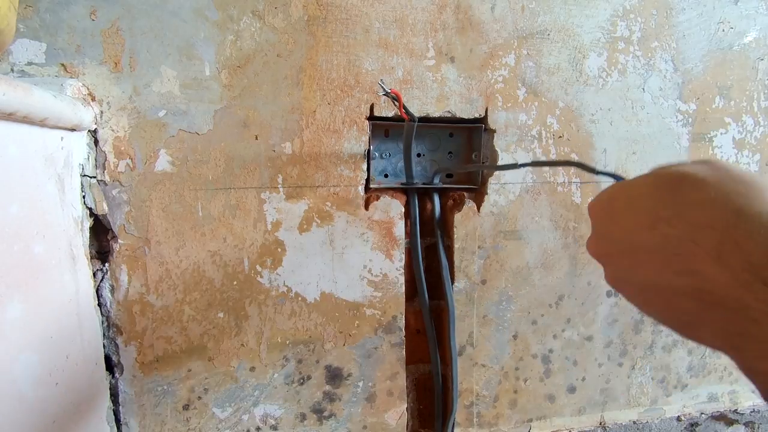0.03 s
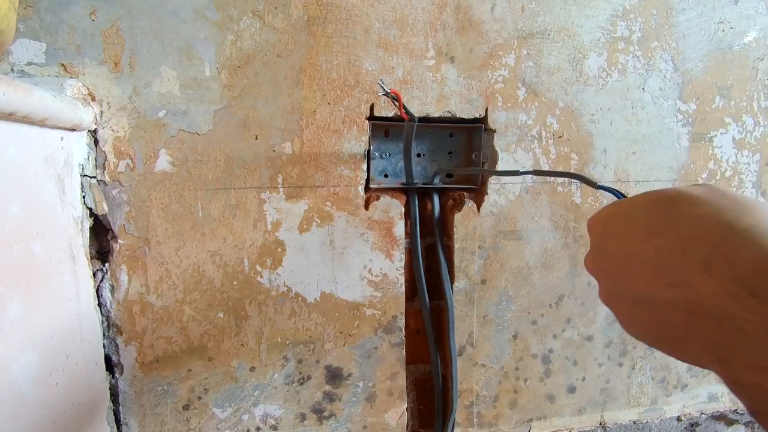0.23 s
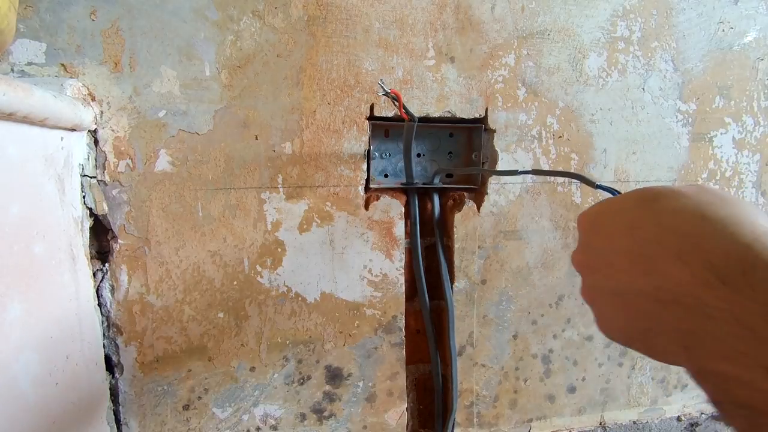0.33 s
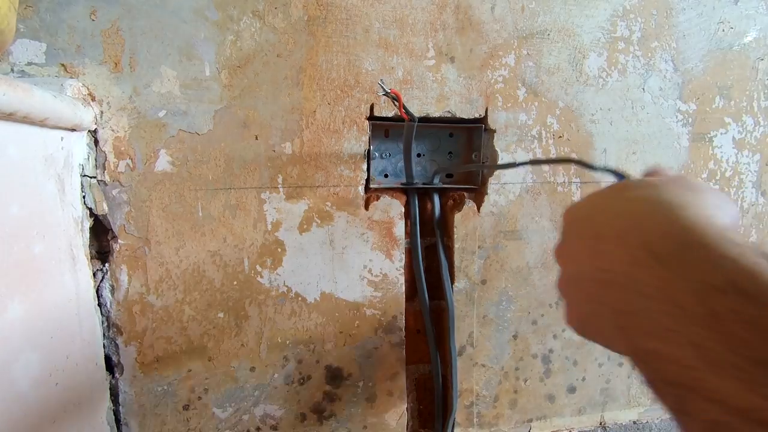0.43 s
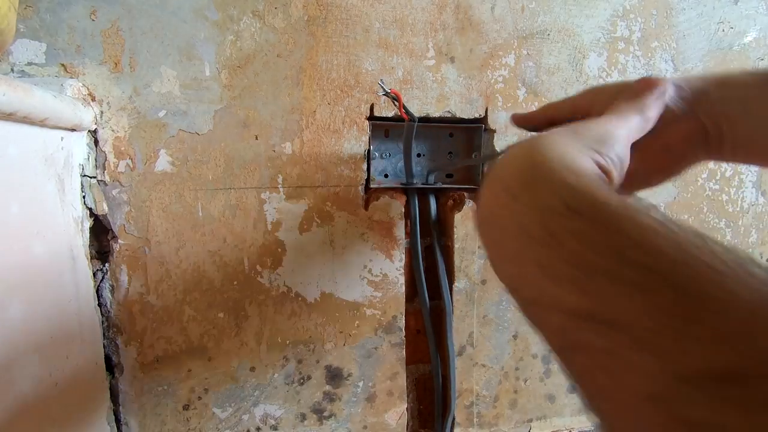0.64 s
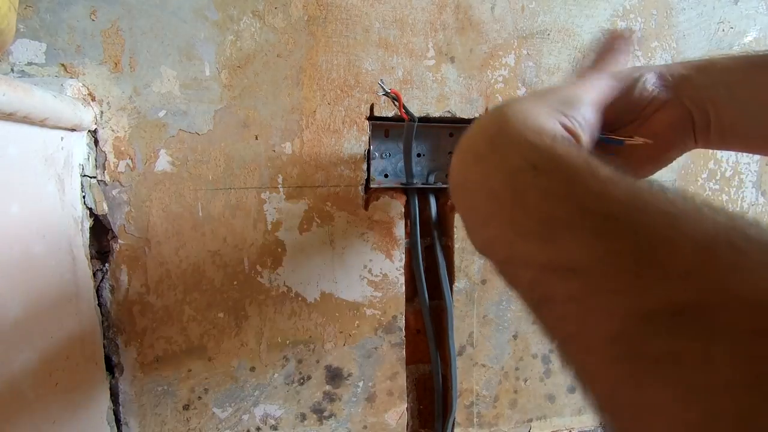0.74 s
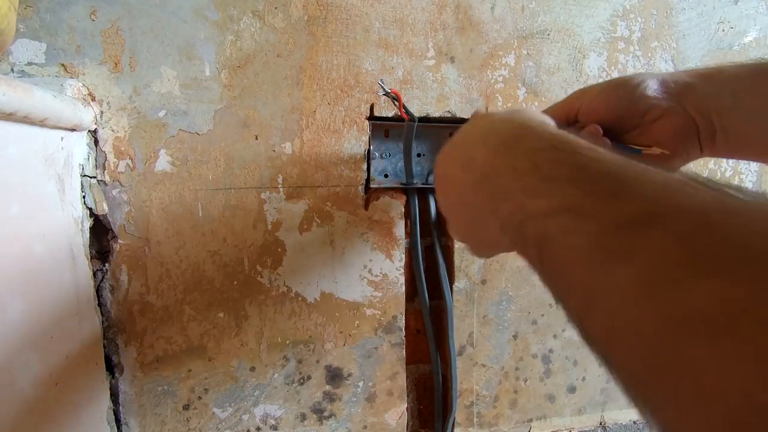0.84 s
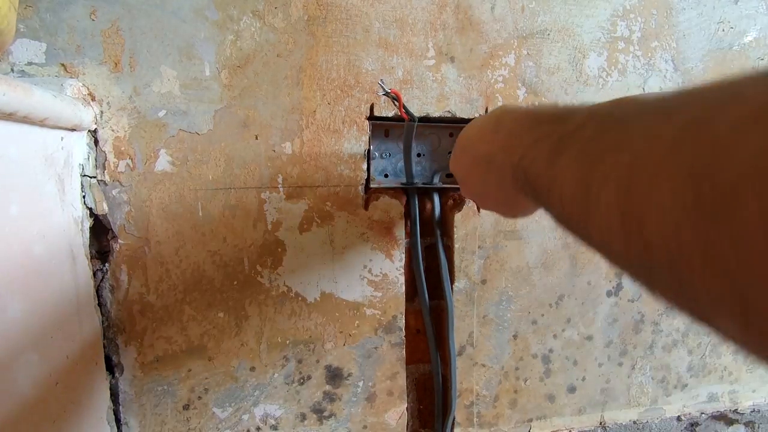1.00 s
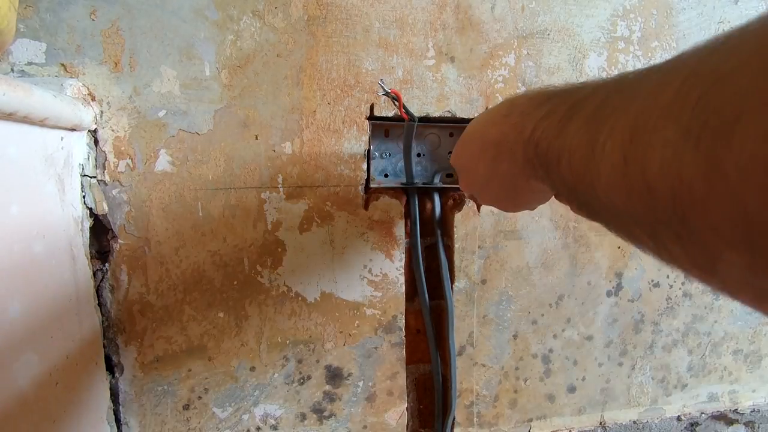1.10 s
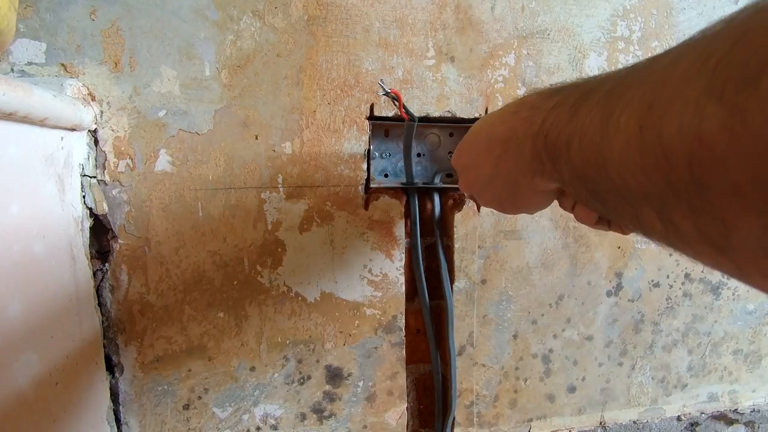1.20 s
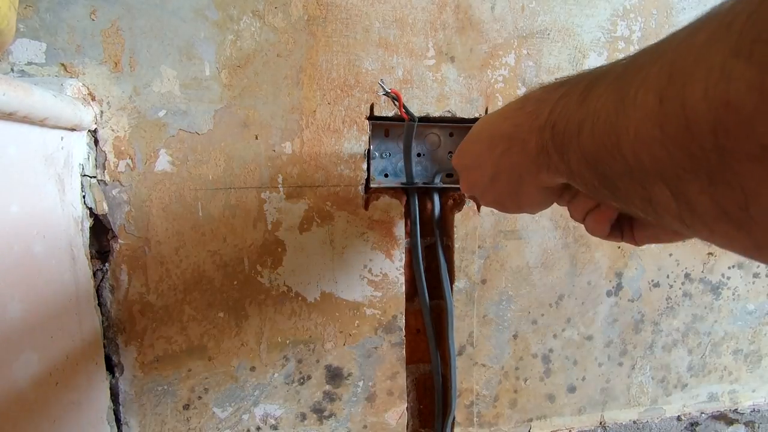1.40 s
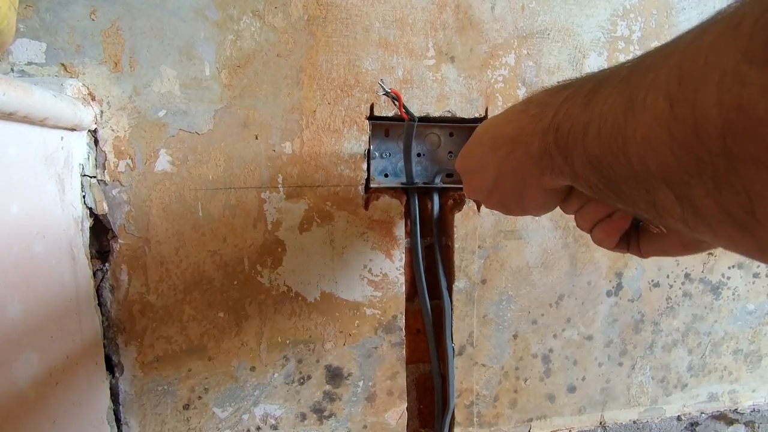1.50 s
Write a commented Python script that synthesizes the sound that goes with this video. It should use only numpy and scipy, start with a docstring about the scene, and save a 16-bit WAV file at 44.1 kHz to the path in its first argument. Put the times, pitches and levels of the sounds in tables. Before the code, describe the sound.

Wire strippers drop onto a hollow board with a loud thud and clatter, then cable creaks softly

```python
"""A bare room: wire strippers drop on a hollow board, thud, clatter and rock to rest, overloading the microphone.
Filtered clicks and damped modes make the thuds, dying noise bursts the steel jaws.
A hand then pats the cable and bends it into a metal wall box: noise ticks and ringing modes make it tick and creak.
Shaped noise makes the short slides, grainy rubbing, a faint early reverberation, the room air and a low rumble.
The struck sounds and the cable's ticks and creaks feed a noise reverberation, heard through two microphone ports."""
import sys
import numpy as np
from scipy import signal
from scipy.fft import rfft, irfft
from scipy.io import wavfile
from scipy.ndimage import uniform_filter1d

SR = 44100
rng = np.random.default_rng(int(sys.argv[2]) if len(sys.argv) > 2 else 0)


def waveform_to_disk(signal):
    """Save audio, clipped to [-1, 1], as 16-bit WAV at the path in sys.argv[1]."""
    frames = np.transpose(np.atleast_2d(signal))
    scaled = np.clip(frames, -1, 1) * 32767
    samples = np.round(scaled).astype(np.int16)
    wavfile.write(sys.argv[1], SR, samples)


N = 68355
T = np.arange(N) / SR
BIN_HZ = np.fft.rfftfreq(N, 1 / SR)


def amp(db):
    """Decibels to gain."""
    return 10 ** (np.asarray(db) / 20)


def unit(x):
    """Scales to an energy of one, averaged over the channels."""
    return x / np.sqrt(np.mean(np.sum(x ** 2, -1)) + 1e-20)


def read(points, hz):
    """Reads a table on a logarithmic frequency axis."""
    f, value = np.transpose(points)
    return np.interp(np.log(hz + 1), np.log(f + 1), value)


def add(mix, s, sound):
    """Mixes a sound in at a given time in seconds."""
    part = mix[:, max(round(s * SR), 0):][:, :sound.shape[-1]]
    part += sound[..., :part.shape[1]]


def noise():
    """White noise at two microphone ports, whose likeness depends on frequency."""
    # likeness of the two ports: (frequency [Hz], correlation [-1 to 1])
    port_likeness = [(30, 1), (130, -0.24), (500, 0.65), (1500, 0.55), (4500, 0.73), (8000, .2),
                     (12000, -0.082)]
    a, b = rfft(rng.standard_normal((2, N)))
    same = np.clip(read(port_likeness, BIN_HZ), -.99, .99)
    mid = a * np.sqrt((1 + same) / 2)
    side = b * np.sqrt((1 - same) / 2)
    return irfft(np.array([mid + side, mid - side]), N)


def hiss(spectrum):
    """Steady coloured noise of rms one."""
    coloured = irfft(rfft(noise()) * amp(read(spectrum, BIN_HZ)), N)
    return unit(coloured) * np.sqrt(N)


def impulse(spectrum, size=4096):
    """A minimum-phase click: the most compact causal sound with this spectrum."""
    log_gain = np.log(amp(read(spectrum, abs(np.fft.fftfreq(size, 1 / SR)))))
    response = np.exp(np.conj(signal.hilbert(log_gain)))
    return unit(np.fft.ifft(response).real)


def burst(spectrum, decay_s, size=2048):
    """A shower of tiny contacts: coloured noise that dies exponentially."""
    shower = noise()[:, :size] * np.exp(-T[:size] / max(decay_s, 1e-4))
    return unit(signal.fftconvolve(shower, impulse(spectrum)[None], axes=1))


def ring(modes, apart=0., size=N):
    """Damped modes of alternating sign, struck once; each port's phase shifts by `apart` radians, in opposite ways."""
    t = T[:size]
    ports = np.array([[-1], [1]])
    total = 0
    for k, (hz, db, t60) in enumerate(modes):
        decay = amp(db - 60 * t / t60)
        total = total + (-1) ** k * decay * np.sin(2 * np.pi * hz * t + apart * ports)
    return unit(total)


def room(x, wet_db, count=14):
    """The diffuse tail of a sound: overlapping noise bands that each die at their own speed."""
    # reverberation time: (frequency [Hz], t60 [s])
    reverb_times = [(60, 0.62), (170, 0.38), (320, .42), (520, 0.52), (800, 0.4), (1400, 0.5), (3000, 0.5),
                    (6000, 0.44), (10000, .34), (15000, 0.25)]
    build_s = 0.0039
    centres = np.geomspace(60, 16000, count)
    z = rfft(noise())
    tail = 0
    for f, band in zip(centres, np.eye(count)):
        weight = read(list(zip(centres, band)), BIN_HZ)  # crossfades into the neighbouring bands
        tail = tail + irfft(z * weight, N) * amp(-60 * T / read(reverb_times, f))
    tail = unit(tail * (1 - np.exp(-T / build_s)))
    return amp(wet_db) * signal.fftconvolve(x, tail, axes=1)[:, :N]


def pan(x, right_db):
    """Leans a sound to the right by a level difference between the ports."""
    return x * amp([[-right_db / 2], [right_db / 2]])


def dropped_tool():
    """Each blow booms the board and rattles the steel jaws; the thuds wake the standing waves of the room."""
    # blows of the tool on the board: (time [s], thud level [dB], thud low edge [Hz], thud high edge [Hz],
    # jaw clatter level [dB], clatter decay constant [s])
    blows = [(.2471, 14.5, 124.4, 410, -6.5, 0.0016), (0.2479, 5.5, 510, 1800, -7.5, 0.009),
             (0.2513, -6.5, 100, 598, 1.5, 0.0075), (.2803, -1, 300, 580, -31, 0.0049),
             (.2848, -19.5, 300, 592, 1.5, 0.0036), (0.3205, 12.5, 65, 838, -10.5, .002),
             (.3216, 6.5, 430, 2060, -1.5, .0015), (0.3239, 10, 306, 1523, 9.5, 0.0031),
             (.3430, -1, 1500, 1900, -13, .004), (0.3964, 5, 70, 236, -31, 0.00287),
             (0.425, -3.5, 80.4, 194, -28, .003), (.4640, 3, 400, 690, -21, 0.0025),
             (.5090, -16.5, 149, 600, -42.5, .003), (0.553, -22, 59.8, 166, -46, .003)]
    # knock of the contact: (frequency [Hz], relative level [dB])
    knock_spectrum = [(30, -19.5), (70, -6), (160, 0), (300, -4), (520, 6), (750, 0), (950, -7),
                      (1150, -21), (1480, -8.5), (2400, -29.5), (8000, -45)]
    # clatter of the steel jaws: (frequency [Hz], relative level [dB])
    jaw_spectrum = [(200, -10.5), (800, -1), (1500, 3.5), (1950, -4.5), (2400, -5), (3350, -2), (4600, -5),
                    (6200, 0), (8000, -4), (10500, -2), (12500, -9), (16000, -15)]
    # modes of the hollow board: (frequency [Hz], relative level [dB], t60 [s])
    board_modes = [(137, -9.5, 0.38), (189, -0.5, 0.06), (323.3, 6, 0.13), (390, -7, 0.047),
                   (570, -9, 0.14), (576, -6.5, .22), (590, -17, .18), (754, -8.5, .16),
                   (839.5, -7.5, 0.39), (1500, 5.5, 0.16)]
    # standing waves of the room: (frequency [Hz], relative level [dB], t60 [s])
    standing_waves = [(70.7, 4.5, 0.56), (463, -1, 0.27), (510, -2, 0.58), (549, -1, .6)]
    board_db, standing_db, low_cut_hz = -18.5, -20, 55

    thuds, clatter, cracks = np.zeros((3, 2, N))
    knock, crack = impulse(knock_spectrum), impulse(jaw_spectrum)
    for s, thud_db, low_hz, high_hz, jaw_db, decay_s in blows:
        thud = signal.lfilter(*signal.butter(3, high_hz, fs=SR), knock)
        thud = signal.lfilter(*signal.butter(2, low_hz, "high", fs=SR), thud)
        add(thuds, s, amp(thud_db) * unit(thud))
        add(clatter, s, amp(jaw_db) * burst(jaw_spectrum, decay_s))
        add(cracks, s, amp(jaw_db) * crack)  # heard only through the room
    modes = amp(board_db) * ring(board_modes, apart=0.36)
    modes = modes + amp(standing_db) * ring(standing_waves, apart=0.29)
    ringing = signal.fftconvolve(thuds, modes, axes=1)[:, :N]
    boom = thuds + room(thuds, wet_db=0.5) + ringing
    boom = signal.sosfilt(signal.butter(6, low_cut_hz, "high", fs=SR, output="sos"), boom)
    rattle = clatter + room(cracks, wet_db=-2.5)
    return pan(boom, right_db=2.5) + pan(rattle, right_db=0.1)


def cable():
    """The stiff cable sticks and slips on the edge of the box: a tick and a short ring each time."""
    # slips: (time [s], pitch [Hz], creak level [dB], dull tick level [dB], bright tick level [dB])
    slips = [(.9930, 970, -52, -38, -46), (1.1514, 950, -25, -24.5, -24.5), (1.1552, 937, -26, -23, -35),
             (1.2022, 895, -26.5, -39, -33), (1.2110, 940, -19.5, -26, -43), (1.223, 920, -55, -28, -40),
             (1.2366, 944, -19, -24.5, -44), (1.2533, 979, -21, -29, -43), (1.27, 961, -18.5, -24.5, -42),
             (1.2825, 968, -20, -28.5, -55), (1.3005, 930, -23.5, -42, -52), (1.3090, 920, -33, -53, -52),
             (1.342, 910, -33.5, -37, -42), (1.4528, 906, -26.5, -37, -60), (1.4660, 931, -22, -20.5, -37),
             (1.4757, 881, -20.5, -23.5, -47), (1.5103, 897, -38, -44, -38), (1.5330, 904, -27.5, -42, -55)]
    # modes of the cable in the box: (multiple of the pitch, relative level [dB], t60 [s])
    box_modes = [(.68, -16, 0.074), (1, 0.5, 0.072), (1.23, -13.5, .03), (1.54, -2, 0.013),
                 (2.03, -4, 0.056), (2.1, -1.5, 0.026), (2.27, -3.5, 0.038), (2.9, -7.5, 0.018),
                 (3.55, -13.5, 0.045), (4.08, -9, 0.0098)]
    # dull tick of the sheath: (frequency [Hz], relative level [dB])
    dull_spectrum = [(200, -10), (700, -0.5), (1800, -3.5), (3400, -5.5), (5200, -9), (7000, -14),
                     (16000, -30)]
    # bright tick of the sheath: (frequency [Hz], relative level [dB])
    bright_spectrum = [(500, -12.5), (4000, -9), (7000, -15), (9000, 3.5), (11000, 2), (12300, -6),
                       (14000, -11), (16000, -8)]

    out = np.zeros((2, N))
    for s, pitch_hz, creak_db, dull_db, bright_db in slips:
        modes = [(pitch_hz * ratio, db, t60) for ratio, db, t60 in box_modes]
        add(out, s, amp(creak_db) * ring(modes, size=8192))
        add(out, s, amp(dull_db) * burst(dull_spectrum, decay_s=0.0027))
        add(out, s, amp(bright_db) * burst(bright_spectrum, decay_s=0.00097))
    return out + room(out, wet_db=-6.5)


def hand_pat():
    """A palm lands softly on the cable: one coloured click and its room tail."""
    # palm on the cable: (frequency [Hz], relative level [dB])
    palm_spectrum = [(150, -2.5), (450, -10), (850, 2.5), (1500, 2), (1950, -2), (2350, -9), (3700, -12),
                     (5500, -25), (15000, -34)]
    pat_s, pat_db = .757, -19
    pat = np.zeros((2, N))
    add(pat, pat_s, amp(pat_db) * impulse(palm_spectrum))
    return pat + room(pat, wet_db=3)


def finger_slides():
    """Fingers slide along the sheath: bright noise in short bell-shaped swells."""
    # slides: (centre time [s], spread as standard deviation [s], level [dB])
    slides = [(0.228, 0.044, -65), (0.69, .03, -77), (0.777, 0.02, -65.5), (.886, 0.013, -57.5)]
    # colour of a slide: (frequency [Hz], relative level [dB])
    slide_spectrum = [(1000, -20.5), (4300, -14.5), (5200, 5), (6300, -3.5), (7100, -10.5), (8500, -6),
                      (11500, -2.5), (13000, -10.5), (16000, -13)]
    swells = sum(amp(db) * np.exp(-((T - s) / spread) ** 2 / 2) for s, spread, db in slides)
    return hiss(slide_spectrum) * swells


def sheath_rubbing():
    """The sheath rubs grainily: noise with a randomly fluttering level."""
    # colour of the rubbing: (frequency [Hz], relative level [dB])
    rub_spectrum = [(100, -17.5), (300, 0.5), (600, 8), (950, -3.5), (1300, -2), (2100, 3), (3300, -4),
                    (5000, -10), (9000, -13), (13000, -18.5), (16000, -22)]
    # strength of the rubbing: (time [s], level [dB])
    rub_levels = [(0, -69.5), (.22, -73), (.6, -75.5), (1.12, -79), (1.16, -64), (1.28, -58), (1.35, -58),
                  (1.425, -63.5), (1.48, -52), (1.55, -58.5)]
    flutter_db = uniform_filter1d(rng.standard_normal(N), size=64) * 20
    grain = unit(amp(flutter_db)) * np.sqrt(N)  # rms one
    return hiss(rub_spectrum) * grain * amp(np.interp(T, *np.transpose(rub_levels)))


def early_reverberation():
    """A faint early reverberation, already in the room: steady coloured noise that fades out."""
    # colour of the early reverberation: (frequency [Hz], relative level [dB])
    reverberation_spectrum = [(59, -53.5), (100, -25), (202, -11.5), (249, -1.5), (535, -12.5), (784, -24),
                              (1010, -5), (1200, -12.5), (2000, -8.5), (2320, -20.5), (2520, -17.5),
                              (9610, -23.5), (16000, -43)]
    reverberation_db, end_s, fade_s = -60.5, 0.43, 0.045
    fade = np.clip((end_s - T) / fade_s, 0, 1)
    return amp(reverberation_db) * hiss(reverberation_spectrum) * fade


def low_rumble():
    """A low rumble that swells as the arms move: deep noise on a level curve."""
    # colour of the rumble: (frequency [Hz], relative level [dB])
    rumble_spectrum = [(20, -7.5), (45, -9), (68, 5.5), (90, -6.5), (128, -1), (180, -11.5), (300, -35.5),
                       (900, -34)]
    # strength of the rumble: (time [s], level [dB])
    rumble_levels = [(0, -65), (.8, -68), (.93, -62), (1.07, -60.5), (1.13, -58.5), (1.22, -53),
                     (1.33, -51.5), (1.42, -58), (1.48, -50), (1.55, -58.5)]
    return hiss(rumble_spectrum) * amp(np.interp(T, *np.transpose(rumble_levels)))


def room_air():
    """Still air of the room: steady noise, strongest in the bass."""
    # colour of the air: (frequency [Hz], relative level [dB])
    air_spectrum = [(25, 2), (70, -5), (130, -13.5), (280, -7), (600, -15), (1500, -18), (3000, -23.5),
                    (9000, -23.5), (13000, -28.5), (16000, -32.5)]
    air_db = -65.5
    return amp(air_db) * hiss(air_spectrum)


def scene():
    """All sources together."""
    hands = hand_pat() + finger_slides() + sheath_rubbing()
    background = early_reverberation() + low_rumble() + room_air()
    return dropped_tool() + cable() + hands + background


def record(dry):
    """The microphone overloads smoothly on the hardest blows; then a low-pass limits the band."""
    ceiling, edge_hz = 0.76, 15900  # ceiling in full-scale amplitude
    clipped = dry / (1 + (dry / ceiling) ** 8) ** (1 / 8)
    low_pass = signal.firwin(255, edge_hz, window=("kaiser", 9), fs=SR)
    return signal.oaconvolve(clipped, low_pass[None], "same")


dry = scene()
out = record(dry)
waveform_to_disk(out)
```